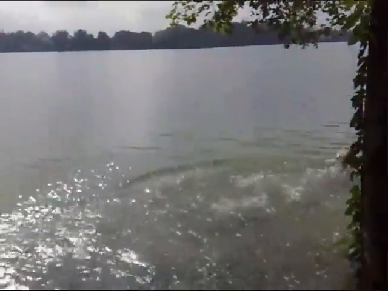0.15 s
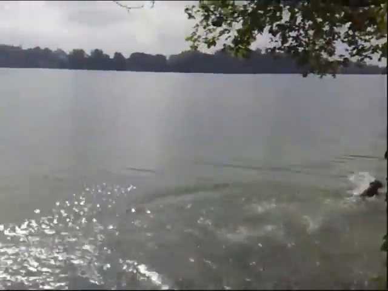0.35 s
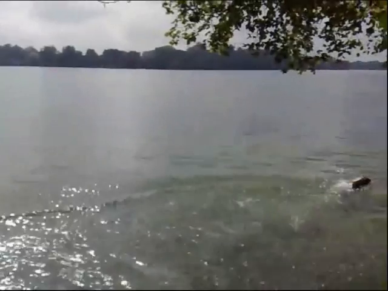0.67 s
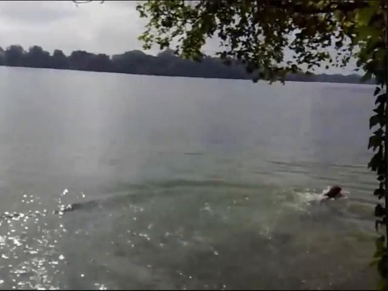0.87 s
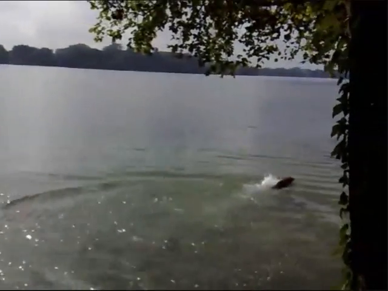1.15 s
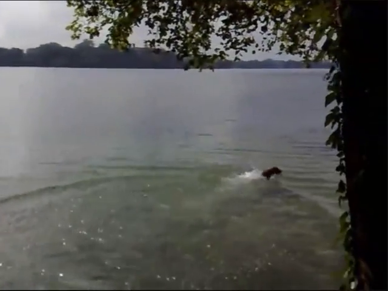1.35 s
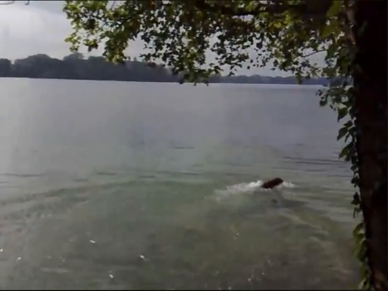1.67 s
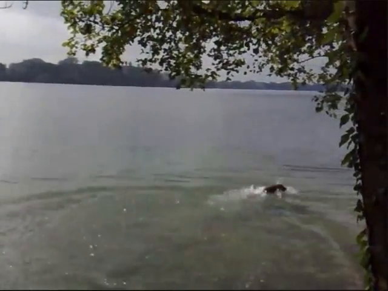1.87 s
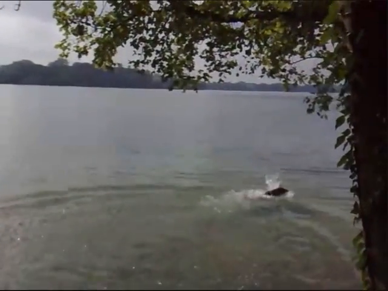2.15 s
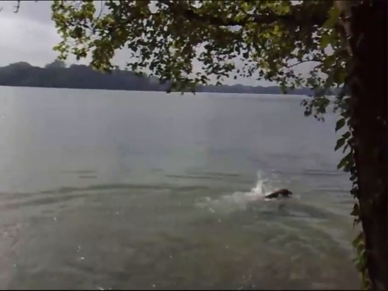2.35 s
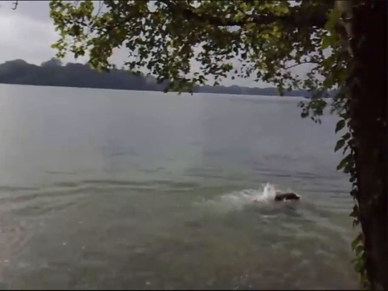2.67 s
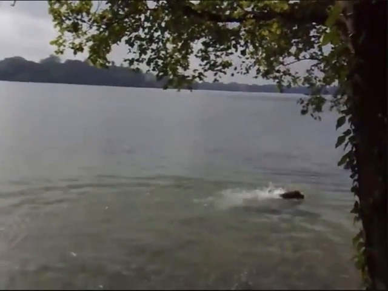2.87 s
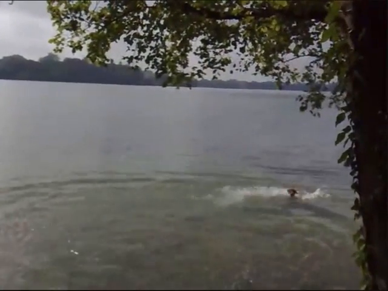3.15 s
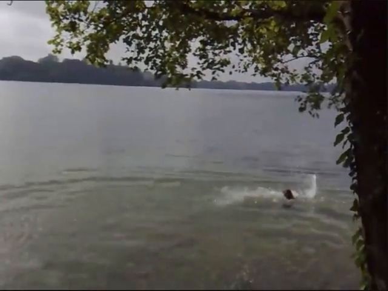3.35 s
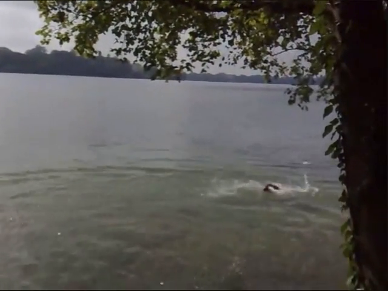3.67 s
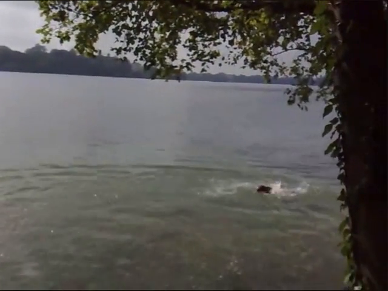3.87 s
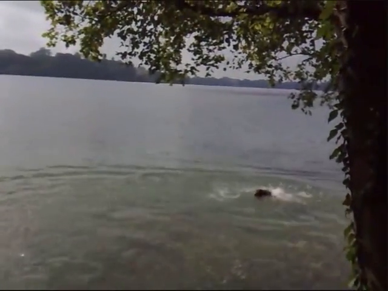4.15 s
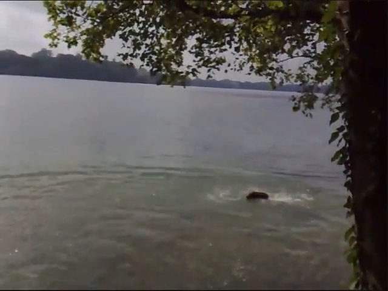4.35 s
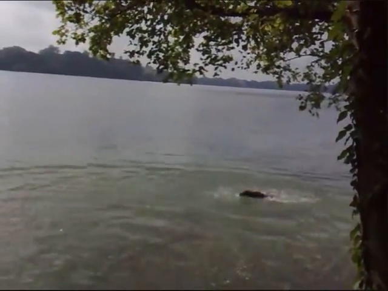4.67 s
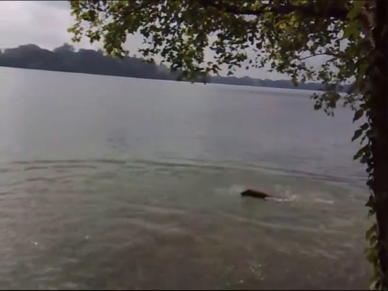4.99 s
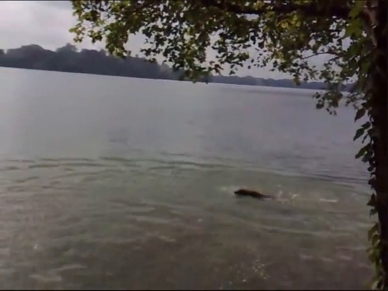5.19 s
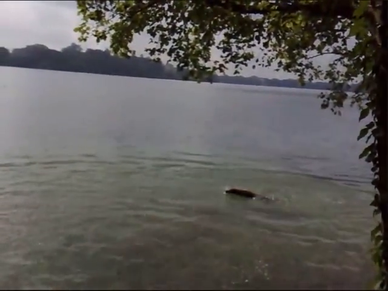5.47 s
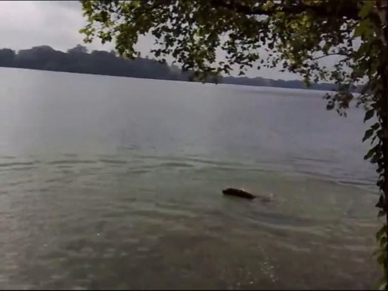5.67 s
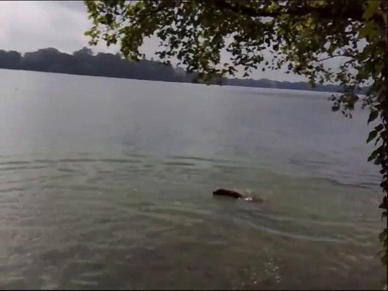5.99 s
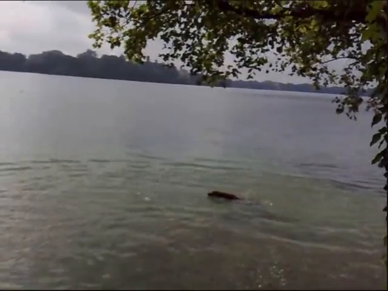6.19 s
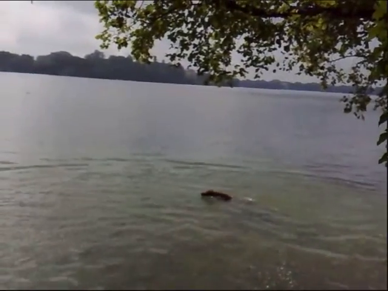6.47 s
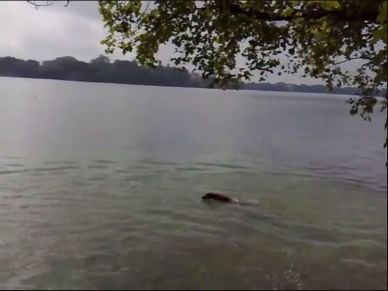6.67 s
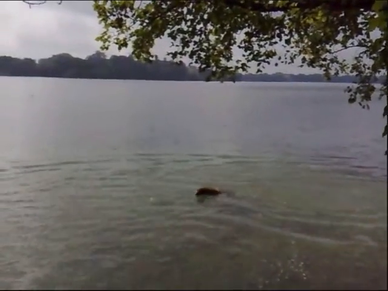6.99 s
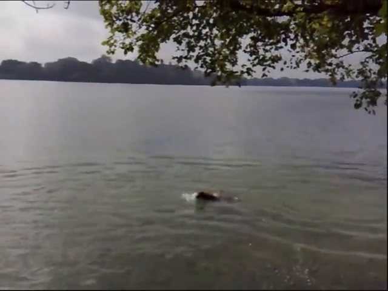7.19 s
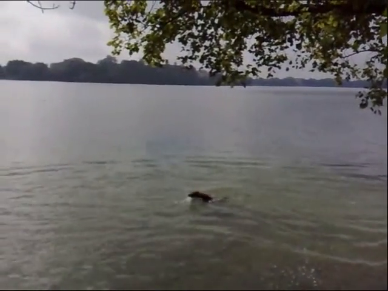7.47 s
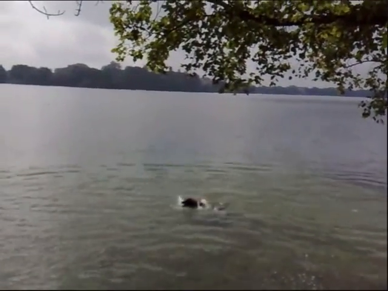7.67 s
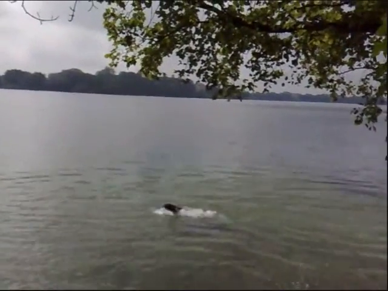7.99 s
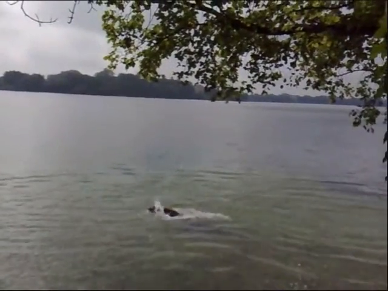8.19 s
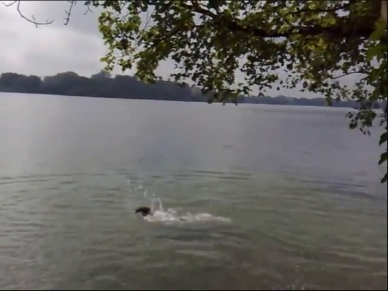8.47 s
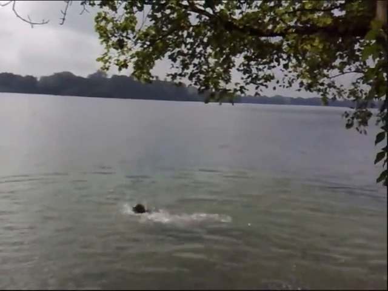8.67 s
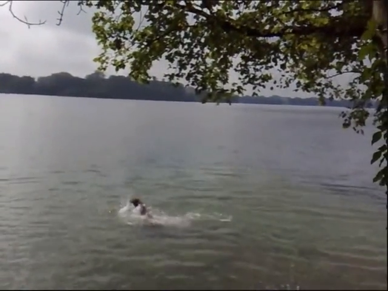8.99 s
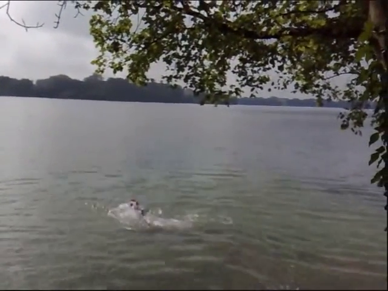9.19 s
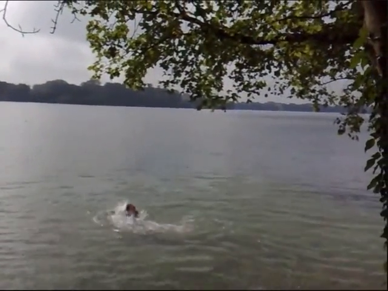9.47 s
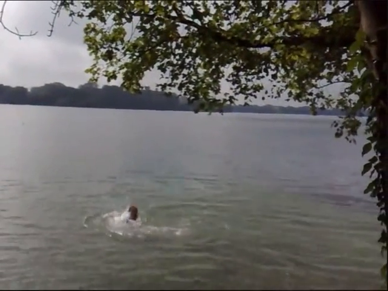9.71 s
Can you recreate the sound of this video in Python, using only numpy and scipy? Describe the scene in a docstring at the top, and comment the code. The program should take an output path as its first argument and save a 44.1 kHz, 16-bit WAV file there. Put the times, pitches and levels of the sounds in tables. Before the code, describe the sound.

Uneven splashing and gurgling of a swimming dog, broken midway by a single rough bark with a brief echo.

```python
"""A calm lake under trees. A dog paddles across: paws slap and ring trapped air, bubbles gurgle,
spray fizzes back down, wet nostrils snort. A second dog by the microphone gives one short, rough
bark that echoes off the trunks and the far bank; it clips softly and the gain dips for a moment.
Low rumble, deep cavity booms, a brief hum and electronic hiss lie underneath."""
import sys
import numpy as np
from scipy import signal
from scipy.fft import rfft, irfft, next_fast_len
from scipy.io import wavfile
from scipy.ndimage import map_coordinates

SR = 44100
rng = np.random.default_rng(int(sys.argv[2]) if len(sys.argv) > 2 else 0)


def unload_audio(sound):
    """Save the sound as a 16-bit wav file, at the path given as the first command line argument."""
    columns = np.transpose(np.atleast_2d(sound))
    # keep every value between -1 and 1, then stretch to whole-number steps
    steps = np.round(np.clip(columns, -1, 1) * 32767)
    wavfile.write(sys.argv[1], SR, steps.astype(np.int16))


N = 433928
TURN_S = 5.5  # swimmer turns back

# noise and water spectra: freq_hz, gain_db
HISS_SPECTRUM = [(120, -35.5), (200, -3), (310, -13.5), (536, -1), (1260, -14), (2570, -14), (4140, -20),
                 (15700, -24.5)]
RUMBLE_SPECTRUM = [(15, -29.5), (50, -1.5), (150, -8.5), (400, -30), (900, -72.5)]
GURGLE_OUT_SPECTRUM = [(88, -8), (150, -1), (189, -4), (258, -5), (332, -5.5), (404, -2), (576, -3.5),
                       (714, 2.5), (1130, -15.5), (1400, -14.5), (1820, -42), (3080, -120)]
GURGLE_BACK_SPECTRUM = [(88, -35), (150, -4), (308, -7.5), (382, -1), (427, -7), (515, -1.5), (627, -12),
                        (837, -4), (1230, -8.5), (1400, -11), (1820, -41), (3080, -120)]
SPLASH_SPECTRUM = [(590, -13), (1000, -0.5), (1240, -4.5), (1460, -2.5), (2240, -1.5), (2880, -6),
                   (3040, -10), (3150, -8.5), (3300, -13), (3840, -22), (4200, -18), (5460, -49.5),
                   (9240, -120)]
SPRAY_SPECTRUM = [(2060, -31.5), (3500, -2.5), (3920, -6), (5330, -1.5), (8160, -14), (10700, -18.5),
                  (15100, -15), (15700, -26.5)]
# rumble contour: time_s, level_db
RUMBLE_LEVELS = [(0, -59), (.6, -47.5), (.8, -60), (1.15, -50), (1.4, -55), (2.37, -46), (2.65, -52),
                 (3.39, -46.5), (4.2, -51), (4.65, -55), (5.12, -54.5), (5.72, -50), (6.15, -57),
                 (6.76, -49.5), (7.28, -54.5), (7.86, -46), (8.2, -53), (8.54, -42.5), (8.7, -57),
                 (9.0, -43.5), (9.4, -52.5), (9.84, -55)]
# hum contour: time_s, pitch_hz, level_db
HUM_CONTOUR = [(5.1, 98, -92), (5.16, 100, -57.5), (5.49, 106.5, -53), (5.53, 119, -41), (5.58, 117, -43),
               (5.605, 117, -58), (5.63, 119, -42.5), (5.68, 119, -44.5), (5.72, 114, -57),
               (5.765, 114, -52.5), (5.78, 114, -41), (5.82, 109.5, -92)]
# decay among the trunks: freq_hz, t60_s
TREE_DECAY = [(200, 0.35), (500, 0.42), (1500, 0.48), (4000, 0.56), (10000, 0.43)]
# deep cavities behind kicks: start_s, level_db, pitch_hz, t60_s
KICK_BOOMS = [(0.475, -35, 53.6, 1), (2.299, -36, 48.4, 0.4), (3.235, -34, 66.6, 0.33),
              (3.454, -26.5, 58, 0.31), (4.966, -39, 54.5, 0.6), (6.6, -32, 79, 0.32),
              (7.521, -38.5, 61.9, 0.38), (8.398, -35, 46.4, 0.65), (9.029, -41, 53.8, 0.3),
              (9.649, -33, 50, 0.27)]
# nostril resonances: start_s, length_s, centre_hz, width_hz, level_db
NOSTRIL_SNORTS = [(6.723, .12, 2230, 300, -44), (6.736, 0.11, 4560, 300, -55), (7.37, 0.04, 3100, 150, -38),
                  (7.414, 0.048, 3170, 150, -39)]
# water drops and one mouth blip: start_s, level_db, pitch_hz, t60_s
RINGING_BLIPS = [(0.835, -39, 940, 0.051), (1.03, -30, 2310, 0.035), (1.119, -30.5, 2600, 0.043),
                 (1.184, -33.5, 2650, 0.078), (1.279, -35, 890, 0.027), (1.656, -26, 805, 0.02),
                 (2.721, -28.5, 850, 0.037), (3.267, -22.5, 816, 0.036), (4.187, -18, 2160, 0.014),
                 (4.335, -32, 820, 0.03), (4.55, -32, 2300, 0.024), (4.574, -32, 1690, 0.035),
                 (4.615, -35, 2500, 0.024), (4.97, -26, 1840, 0.017), (5.205, -44, 1220, 0.03),
                 (5.489, -46.5, 883, 0.08), (5.501, -48, 1597, .04), (5.776, -36, 2600, 0.044),
                 (6.179, -35, 1610, 0.054), (6.438, -36, 952, 0.019), (7.046, -34.5, 785, 0.04),
                 (7.099, -32, 2060, 0.022), (7.14, -27, 1020, 0.022), (7.381, -22, 3040, 0.09),
                 (7.439, -32, 910, 0.064), (7.613, -24, 2070, 0.018), (7.64, -20.5, 900, 0.025),
                 (8.326, -30, 1150, 0.033), (8.522, -29, 2050, 0.024), (8.741, -28, 1560, 0.031),
                 (8.782, -29, 2040, 0.016), (8.919, -27, 1190, 0.047), (9.454, -29, 1030, 0.027)]
# flung spray landing: start_s, level_db
SPRAY_TICKS = [(.1934, -45), (.5088, -41), (1.1014, -32), (1.955, -45), (2.5017, -35), (2.9088, -27.5),
               (3.268, -27), (3.8432, -38), (4.0582, -34), (4.1881, -35.5), (4.452, -33), (4.582, -38),
               (4.8121, -43), (5.2076, -44.5), (6.14, -40), (6.4887, -46), (6.9197, -46), (7.0457, -36),
               (7.1446, -40), (7.3767, -25.5), (7.6144, -39), (7.7953, -31.5), (7.9773, -40), (8.326, -35),
               (8.388, -37), (8.6173, -48), (9.0517, -35), (9.0996, -28), (9.2472, -36), (9.644, -42)]
# closing or opening cavities: start_s, level_db, pitch_hz, t60_s, glide
CAVITY_GULPS = [(0.211, -35, 2380, 0.21, -2.5), (1.865, -30.5, 129, 0.14, 0),
                (2.155, -29.5, 152.6, 0.16, 2), (3.561, -31, 139, 0.072, 1), (3.762, -41, 119, 0.15, 2),
                (4.201, -30, 200, 0.08, 2.5), (7.672, -25.5, 329, 0.07, 1.5),
                (7.865, -28.5, 478, 0.058, .3), (8.035, -29, 380, .05, .2), (8.52, -29, 340, .05, .2),
                (8.56, -28, 217, 0.22, 2), (8.97, -26.5, 360, 0.11, 0.5), (9.03, -25.5, 486, 0.048, 0.2),
                (9.175, -26.5, 483, 0.09, 1), (9.225, -25, 390, 0.11, 0.5)]
# steady churn: time_s, gurgle_db, splash_db, spray_db
CHURN_LEVELS = [(0, -50.5, -51, -64), (.16, -54.5, -59, -66), (.4, -67, -56, -59.5),
                (.85, -45.5, -48, -58.5), (1.42, -48.5, -56.5, -68), (1.75, -50.5, -46.5, -61),
                (2.2, -44, -47, -57), (2.65, -44, -47, -59), (3.2, -48, -47, -56), (3.6, -46.5, -47.5, -56),
                (3.95, -48, -44.5, -56.5), (4.55, -52, -50, -57), (4.72, -66, -59.5, -69),
                (5.4, -73, -72, -80), (6.36, -51, -57, -76.5), (6.7, -67, -62.5, -72),
                (7.25, -69, -58, -66.5), (7.55, -44, -46.5, -57), (8.15, -46.5, -47.5, -60),
                (8.75, -48, -48, -59.5), (9.2, -44.5, -51, -63), (9.35, -51, -51, -60),
                (9.84, -46, -51.5, -62.5)]
# paddle strokes: peak_s, length_s, gurgle_db, splash_db, spray_db
PADDLE_STROKES = [(0.015, 0.046, -42, -50.5, -67), (0.208, 0.079, -35.5, -37, -58),
                  (0.247, .12, -48, -37.5, -58), (0.276, 0.14, -39, -37, -56),
                  (0.471, 0.11, -33.5, -35, -51.5), (0.651, 0.1, -29, -33, -56),
                  (0.704, 0.046, -34, -47, -66), (.84, .05, -38, -48, -60), (1.055, 0.13, -37, -49, -54),
                  (1.08, 0.48, -45.5, -43.5, -53.5), (1.264, 0.11, -32, -38.5, -66),
                  (1.64, 0.11, -37.5, -44.5, -58), (1.845, 0.18, -35.5, -41.5, -61),
                  (1.952, 0.1, -30, -38, -49), (2.167, 0.083, -43, -49, -61), (2.284, 0.057, -32, -41, -50),
                  (2.513, 0.064, -26.5, -46, -55), (2.653, 0.073, -43.5, -62, -69),
                  (2.848, 0.056, -29.5, -38.5, -49), (2.9, .3, -46, -50, -51.5),
                  (3.085, 0.084, -36, -59, -66), (3.264, 0.06, -45, -33.5, -47),
                  (3.375, 0.12, -30.5, -31, -48.5), (3.447, .08, -30.5, -35, -56),
                  (3.56, 0.2, -58, -43, -55), (3.852, 0.053, -46, -37, -58),
                  (4.027, 0.078, -33.5, -38.5, -53), (4.104, 0.22, -64, -43.5, -49),
                  (4.214, 0.076, -39, -48, -49.5), (4.295, 0.045, -30.5, -50, -66),
                  (4.59, 0.059, -59, -51, -61), (4.863, 0.14, -41, -37.5, -51),
                  (5.129, 0.029, -41, -54, -68), (5.159, .04, -70, -53, -68),
                  (5.211, 0.028, -63, -46.5, -64), (5.502, 0.026, -59, -51, -70),
                  (6.446, 0.093, -51, -45.5, -63), (6.756, .08, -53, -45.5, -57.5),
                  (6.782, .06, -41, -42.5, -52), (7.062, 0.066, -50.5, -42, -54),
                  (7.139, 0.05, -55, -39, -54.5), (7.392, .12, -34.5, -30.5, -47),
                  (7.537, 0.072, -31, -58, -56), (7.615, 0.071, -50, -36.5, -52),
                  (7.672, 0.095, -39, -38.5, -49), (7.774, 0.045, -30.5, -37, -52),
                  (7.943, 0.19, -38.5, -62, -75), (8.225, 0.15, -42, -37.5, -56),
                  (8.4, 0.082, -25.5, -32, -46), (8.59, 0.11, -35, -57, -76), (8.741, 0.045, -48, -40, -52),
                  (8.896, 0.2, -32, -35.5, -51.5), (9.031, 0.14, -36, -34.5, -46),
                  (9.16, 0.044, -36, -52, -56), (9.244, 0.064, -35, -44, -58), (9.456, 0.19, -42, -51, -59),
                  (9.644, 0.071, -32, -35, -47.5), (9.83, 0.061, -38, -47, -58)]
# loss one stroke length after the peak, rows gurgle, splash, spray: loss_db
STROKE_FADE_DB = [
    [20.5],
    [18.5],
    [14.5],
]
# paws trapping air: start_s, level_db, pocket_hz, t60_s, smack_re_pocket_db
PAW_SLAPS = [(0.193, -21.5, 144, 0.065, -1), (0.269, -36.5, 746, 0.087, 15.5), (0.307, -30, 193, 0.06, 0),
             (0.448, -24.5, 520, 0.079, -6), (0.474, -34, 730, 0.06, -6), (0.613, -26, 552, 0.087, -2),
             (0.669, -23.5, 950, 0.061, -11), (1.072, -18.5, 165, 0.063, -25), (1.254, -26, 143, 0.059, -6),
             (1.812, -30.5, 822, 0.094, -2), (1.934, -31, 870, 0.06, 2), (1.957, -18, 745, 0.045, -14),
             (2.089, -30, 424, 0.11, 4), (2.274, -16, 368, 0.038, -8), (2.5, -26, 766, 0.067, 1.5),
             (2.524, -25, 784, 0.1, -17), (2.854, -25, 686, 0.058, -12), (3.223, -29, 826, 0.08, 3),
             (3.442, -19, 190, 0.042, -19), (3.867, -22.5, 793, 0.051, -9), (4.015, -34, 700, 0.06, 10),
             (4.293, -16, 280, 0.037, -22), (4.843, -32.5, 376, 0.081, 9), (5.123, -33.5, 823, 0.056, -20),
             (7.525, -28.5, 167, 0.084, -17), (7.766, -26, 394, 0.062, -9), (8.386, -13, 282, 0.05, -21),
             (8.884, -22.5, 320, 0.089, -17), (9.155, -25, 446, 0.046, -12), (9.638, -21.5, 768, 0.062, -7),
             (9.812, -34, 720, 0.073, -4)]
# bark contour: time_s, pitch_hz, fundamental_db, overtones_db, roughness
BARK_CONTOUR = [(5.765, 251, -69, -78, 0.18), (5.78, 281, -39.5, -55.5, 0.72),
                (5.82, 359.1, -40.5, -49.5, 0.38), (5.845, 450.3, -32.5, -45, 0.4),
                (5.86, 529.7, -20.5, -19, 0.19), (5.872, 540.7, -4, -6.5, 0.14),
                (5.878, 517.1, -6.5, -5, 0.56), (5.89, 495, -11, -1.5, 0.45),
                (5.911, 481, -13.5, 2.5, 0.45), (5.925, 498.5, -12.5, -5, 0.3),
                (5.94, 432, -16.5, -16.5, 0.5), (5.959, 321.5, -28.5, -22, .3),
                (5.98, 301, -75.5, -67, 0.5)]
# throat resonances: centre_hz, width_hz, gain_db
THROAT_FORMANTS = [(250, 470, -19.5), (860, 250, -0.5), (1655, 247, -3), (2564, 180, -8.5),
                   (3500, 890, -28.5), (5030, 1600, -27.5)]


def amp(db):
    return 10 ** (np.asarray(db) / 20)


def unit_rms(x):
    return x / np.sqrt(np.mean(x ** 2) + 1e-20)


def log_interp(points, hz):
    """(freq_hz, value) points read on a log axis."""
    freq_hz, values = np.transpose(points)
    return np.interp(np.log(hz + 1), np.log(freq_hz + 1), values)


def curves(rows):
    """Per-sample curve for each column after time_s."""
    time_s, *columns = np.transpose(rows)
    return [np.interp(np.arange(N) / SR, time_s, column) for column in columns]


def wobble(rate_hz):
    """Smooth random curve."""
    knots = rng.standard_normal(int(N * rate_hz / SR) + 4)
    return map_coordinates(knots, [np.arange(N) * rate_hz / SR])


def filtered(x, response):
    """x through a complex frequency response."""
    size = next_fast_len(N + SR // 2)
    return irfft(rfft(x, size) * response(np.fft.rfftfreq(size, 1 / SR)), size)[..., :N]


def shaped(x, spectrum):
    return filtered(x, lambda hz: amp(log_interp(spectrum, hz)))


def coloured(x, spectrum):
    return unit_rms(shaped(x, spectrum))


def bursts(start_s, level_db, t60_s, spectrum):
    """Decaying noise bursts of one colour."""
    t, out = np.arange(4096) / SR, np.zeros(N + 4096)
    for at_s, db, life_s in np.broadcast(start_s, level_db, t60_s):
        out[round(at_s * SR):][:len(t)] += amp(db - 60 * t / life_s) * rng.standard_normal(len(t))
    return shaped(out[:N], spectrum)


def bubbles(start_s, gain, hz, t60_s, glide, samples):
    """Damped sines; pitch moves by the share 2 * glide per t60, upward as a bubble nears the surface."""
    t = np.arange(samples) / SR
    start_s, gain, hz, t60_s, glide = (np.reshape(v, (-1, 1)) for v in (start_s, gain, hz, t60_s, glide))
    envelope = amp(-60 * t / t60_s) * (1 - np.exp(-1.5 * t * hz))
    tone = np.sin(2 * np.pi * hz * t * (1 + glide * t / t60_s))
    index = (start_s * SR).astype(int) + np.arange(samples)
    return np.bincount(index.ravel(), (gain * envelope * tone).ravel(), N + samples)[:N]


def hiss(level_db=-57.5):
    """Steady electronic noise."""
    return amp(level_db) * coloured(rng.standard_normal(N), HISS_SPECTRUM)


def rumble():
    """Low noise, wandering in level."""
    level_db, = curves(RUMBLE_LEVELS)
    noise = coloured(rng.standard_normal(N), RUMBLE_SPECTRUM)
    return amp(level_db + 4.1 * wobble(9)) * noise


def hum():
    """Low wavering tone before the bark."""
    pitch_hz, level_db = curves(HUM_CONTOUR)
    return amp(level_db + 3 * wobble(40)) * np.sin(2 * np.pi * np.cumsum(pitch_hz) / SR)


def shore_echo(x, echo_db=-13, bank_re_trunks_db=-22, bank_t60_s=1.56, delay_samples=1300):
    """Trunks scatter sound back but let the bass pass; the far bank answers duller and longer."""
    hz, t, noise = signal.stft(rng.standard_normal(SR), SR, nperseg=256)
    hz = hz[:, None]
    trunks = amp(-60 * t / log_interp(TREE_DECAY, hz)) / np.sqrt(1 + (480 / (hz + 1)) ** 4)
    bank = amp(bank_re_trunks_db - 60 * t / bank_t60_s - hz / 400)
    tail = signal.istft(noise * (trunks + bank), SR, nperseg=256)[1]
    delayed = np.pad(x, (delay_samples, 0))
    return amp(echo_db) * signal.fftconvolve(delayed, tail / np.linalg.norm(tail))[:N]


def booms():
    """Deep cavities collapse behind strong kicks."""
    start_s, level_db, pitch_hz, t60_s = np.transpose(KICK_BOOMS)
    return bubbles(start_s, amp(level_db), pitch_hz, t60_s, glide=0.1, samples=16384)


def snorts():
    """Air through wet nostrils: noise in narrow resonances."""
    t, out = np.arange(N) / SR, np.zeros(N)
    for start_s, length_s, centre_hz, width_hz, level_db in NOSTRIL_SNORTS:
        swell = np.sin(np.pi * np.clip((t - start_s) / length_s, 0, 1))
        air = filtered(rng.standard_normal(N), lambda hz: 1 / (1 + (2 * (hz - centre_hz) / width_hz) ** 2))
        out += amp(level_db) * swell * unit_rms(air)
    return out


def blips():
    """Short ringing blips: water drops, and a high mouth blip as the bark begins."""
    start_s, level_db, pitch_hz, t60_s = np.transpose(RINGING_BLIPS)
    return bubbles(start_s, amp(level_db), pitch_hz, t60_s, glide=0.038, samples=4096)


def spatter(t60_s=0.043):
    """Flung spray lands as bright ticks."""
    start_s, level_db = np.transpose(SPRAY_TICKS)
    return bursts(start_s, level_db, t60_s, SPRAY_SPECTRUM)


def gulps():
    """Hollow cavities glide in pitch as they close or open."""
    start_s, level_db, pitch_hz, t60_s, glide = np.transpose(CAVITY_GULPS)
    return bubbles(start_s, amp(level_db), pitch_hz, t60_s, glide, samples=8192)


def froth(low_hz, high_hz, t60_cycles, spread_db, share, count, samples):
    """Random bubbles over rushing noise; share is the bubbles' part of the power."""
    when, pitch, rank = rng.random((count, 3)).T
    hz = low_hz * (high_hz / low_hz) ** pitch
    gain = hz * amp(-spread_db * np.log(rank + 0.05))  # even energy per Hz
    ringing = bubbles(when * N / SR, gain, hz, t60_cycles / hz, glide=0.051, samples=samples)
    return np.sqrt(share) * unit_rms(ringing) + np.sqrt(1 - share) * rng.standard_normal(N)


def stroke_gains(rise_share=0.44):
    """Gurgle, splash and spray gains: steady churn plus a quick rise and slower fall per stroke."""
    t, power = np.arange(N) / SR, amp(curves(CHURN_LEVELS)) ** 2
    for peak_s, length_s, *levels_db in PADDLE_STROKES:
        span = slice(max(round((peak_s - 2 * length_s) * SR), 0), round((peak_s + 3 * length_s) * SR))
        age = (t[span] - peak_s) / length_s
        fade_db = np.array(STROKE_FADE_DB) * np.maximum(age, -age / rise_share)
        power[:, span] += amp(np.c_[levels_db] - fade_db) ** 2
    return np.sqrt(power)


def churning_water(landings_per_s=70, landing_decay_s=0.0045):
    """Big bubbles gurgle, small ones splash, droplets fizz; one surge shakes all three."""
    gurgle_gain, splash_gain, spray_gain = stroke_gains()
    surge_db = wobble(22)
    big = froth(150, 1400, t60_cycles=40, spread_db=3, share=0.1, count=1500, samples=2400)
    small = froth(1000, 4000, t60_cycles=40, spread_db=2, share=0.1, count=3000, samples=1000)
    fine = froth(3200, 15000, t60_cycles=4.4, spread_db=3, share=0.14, count=6000, samples=48)
    landings = (rng.random(N) < landings_per_s / SR) * rng.exponential(0.55, N)
    crackle = unit_rms(1 + signal.lfilter([1], [1, -np.exp(-1 / (landing_decay_s * SR))], landings))
    outbound = np.arange(N) < TURN_S * SR
    gurgle = np.where(outbound, coloured(big, GURGLE_OUT_SPECTRUM), coloured(big, GURGLE_BACK_SPECTRUM))
    splash = coloured(small, SPLASH_SPECTRUM) * np.sqrt(crackle)
    spray = coloured(fine, SPRAY_SPECTRUM) * crackle
    return (gurgle_gain * amp(1.4 * surge_db) * gurgle
            + splash_gain * amp(1.27 * surge_db) * splash
            + spray_gain * amp(surge_db) * spray)


def paw_slaps(thud_re_pocket_db=2):
    """Each paw rings its air pocket amid a dull thud and a short bright smack."""
    start_s, level_db, pocket_hz, t60_s, smack_db = np.transpose(PAW_SLAPS)
    pocket = bubbles(start_s, amp(level_db), pocket_hz, t60_s, glide=0.196, samples=4096)
    outbound = start_s < TURN_S
    thud = sum(bursts(start_s[leg], level_db[leg] + thud_re_pocket_db, 1.9 * t60_s[leg], spectrum)
               for leg, spectrum in ((outbound, GURGLE_OUT_SPECTRUM), (~outbound, GURGLE_BACK_SPECTRUM)))
    smack = bursts(start_s, level_db + smack_db, 1.13 * t60_s, SPLASH_SPECTRUM)
    return pocket + thud + smack


def vocal_tract(hz, lips_hz=4000):
    """Throat resonances of alternating sign, low-passed at the lips."""
    throat = 0
    for k, (centre_hz, width_hz, gain_db) in enumerate(THROAT_FORMANTS):
        damping = 1j * hz * width_hz
        throat += (-1) ** k * amp(gain_db) * damping / (centre_hz ** 2 - hz ** 2 + damping)
    return throat / (1 + 1j * hz / lips_hz) ** 2


def bark():
    """A rising whine bursts into a rough bark as the folds lose their rhythm, then sinks."""
    span = slice(round(BARK_CONTOUR[0][0] * SR), round(BARK_CONTOUR[-1][0] * SR))
    pitch_hz, fundamental_db, overtones_db, roughness = (curve[span] for curve in curves(BARK_CONTOUR))
    jitter, shimmer, sway = (roughness * wobble(rate_hz)[span] for rate_hz in (350, 250, 200))
    phase = 2 * np.pi * np.cumsum(pitch_hz * (1 + 0.145 * jitter)) / SR
    tilt_db = 0.0964 * np.minimum(overtones_db + 21.5, 0) - 0.8  # per overtone: soft voicing is dull
    overtones = sum(amp(tilt_db * (k - 2)) * np.sin(k * phase + k * k) for k in range(2, 12))
    breath = 7 * (1 + 0.5 * np.cos(phase)) * rng.standard_normal(len(phase))  # swells once a cycle
    folds, fundamental, rasp = np.zeros((3, N))
    folds[span] = amp(overtones_db) * ((1 + 0.72 * shimmer) * overtones + roughness * breath)
    fundamental[span] = amp(fundamental_db) * np.sqrt(2) * (1 + 0.22 * sway) * np.sin(phase)
    rasp_db = 0.72 * np.maximum(fundamental_db, overtones_db) - 22.5
    rasp[span] = amp(rasp_db) * rng.standard_normal(len(phase))  # air past the teeth
    return fundamental + 1.19 * filtered(folds, vocal_tract) + shaped(rasp, SPRAY_SPECTRUM)


def scene():
    """Bark, swimmer, background and echo at one microphone."""
    voice = bark()
    noise_floor = hiss()
    swimmer = churning_water() + paw_slaps() + gulps() + spatter() + booms() + snorts()
    return (noise_floor + rumble() + hum() + blips() + swimmer + shore_echo(voice) + voice)[None]


def record(dry, knee_db=-30, ceiling=1.08, low_cut_hz=22, top_hz=15800):
    """Lagging gain control, soft clipping, band limits."""
    power = dry ** 2
    for lag_s in (0.09, 0.17):
        step = 1 / (lag_s * SR)
        power = signal.lfilter([step], [1, step - 1], power)
    ducked = dry / (1 + power / amp(knee_db) ** 2) ** 0.16
    clipped = ducked / (1 + np.abs(ducked / ceiling) ** 4) ** (1 / 4)
    return filtered(clipped, lambda hz: (hz < top_hz) / (1 + (low_cut_hz / (hz + 1)) ** 4))


dry = scene()
out = record(dry)
unload_audio(out)
```